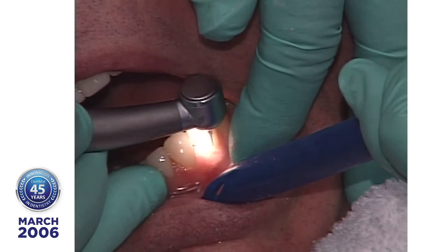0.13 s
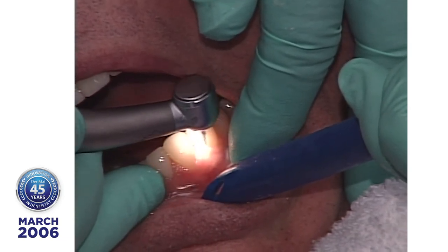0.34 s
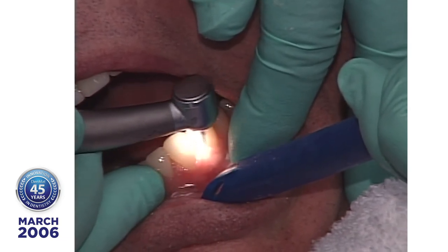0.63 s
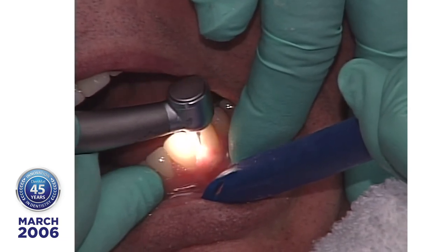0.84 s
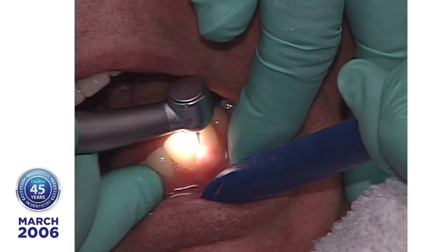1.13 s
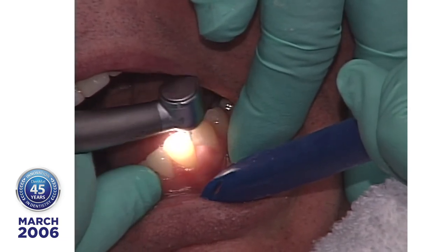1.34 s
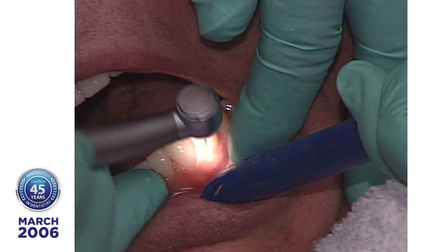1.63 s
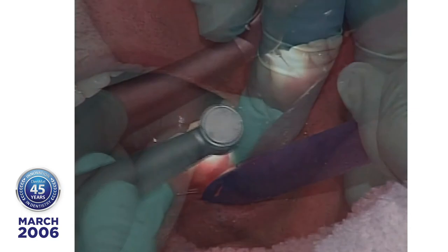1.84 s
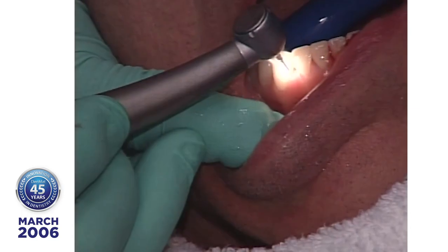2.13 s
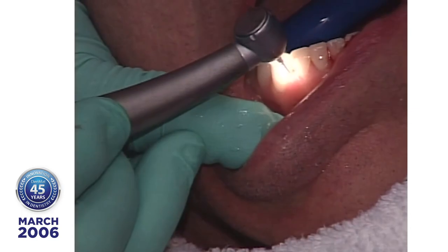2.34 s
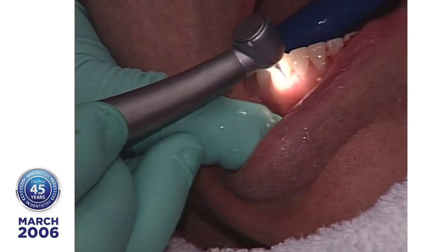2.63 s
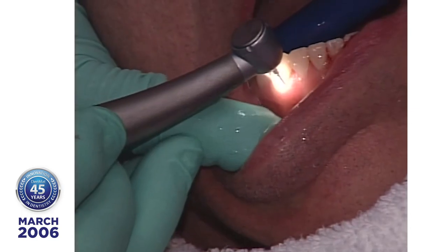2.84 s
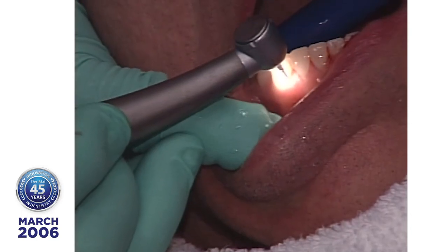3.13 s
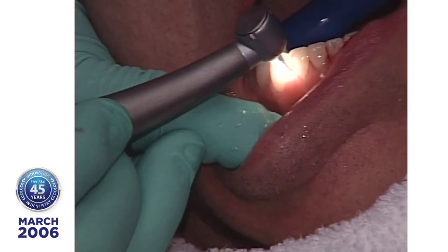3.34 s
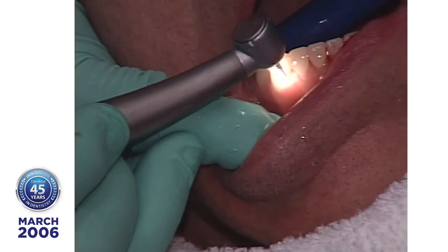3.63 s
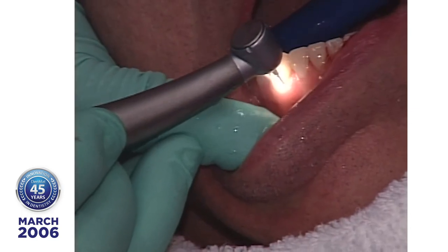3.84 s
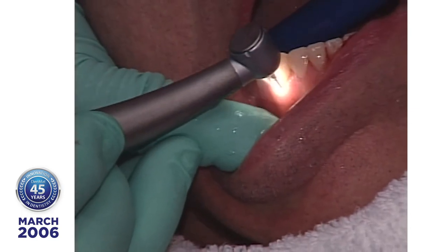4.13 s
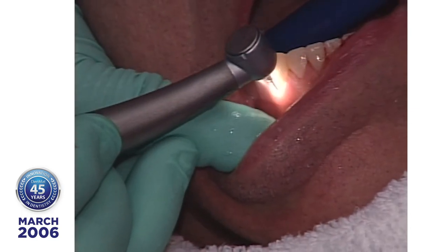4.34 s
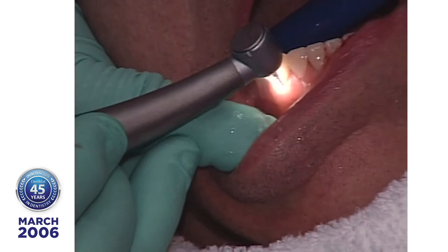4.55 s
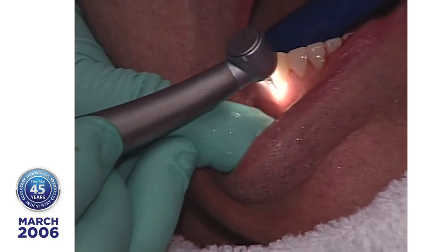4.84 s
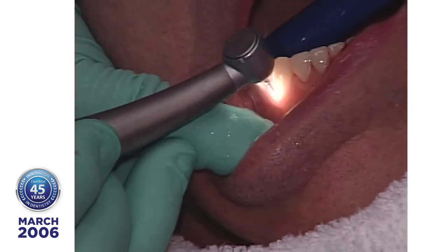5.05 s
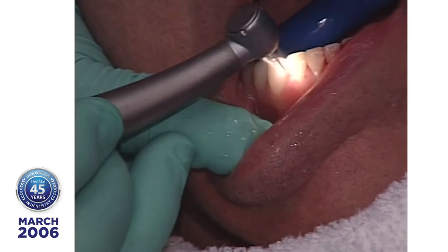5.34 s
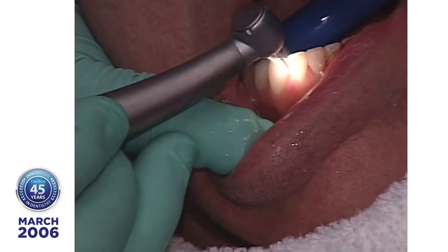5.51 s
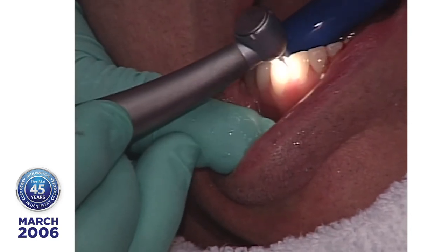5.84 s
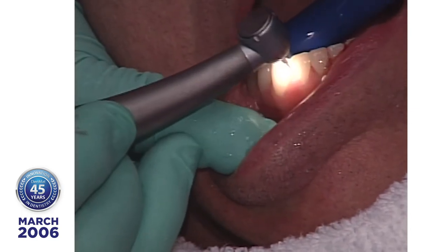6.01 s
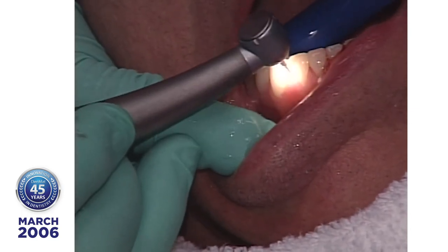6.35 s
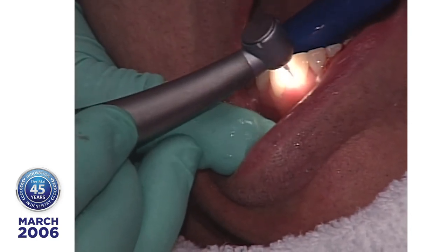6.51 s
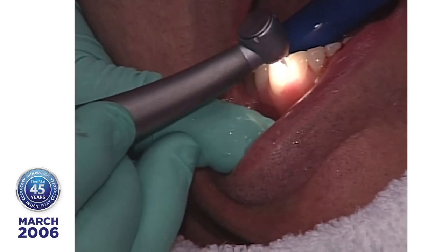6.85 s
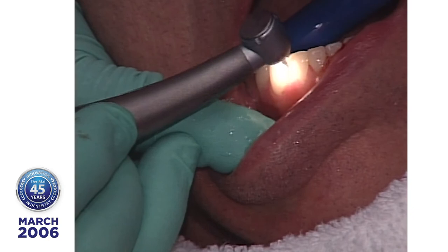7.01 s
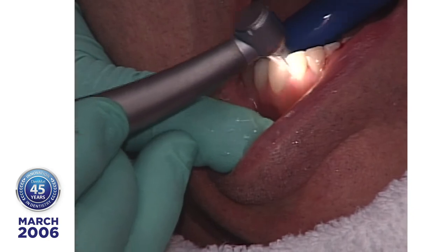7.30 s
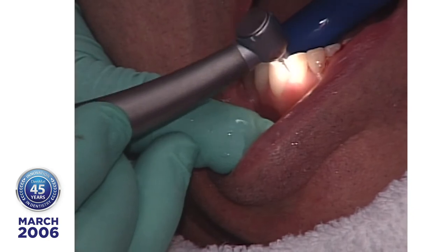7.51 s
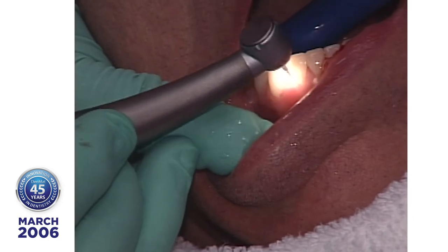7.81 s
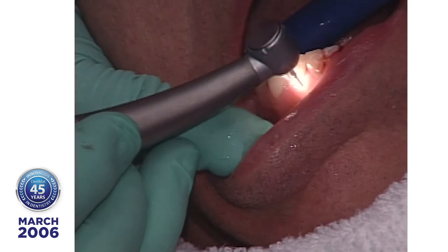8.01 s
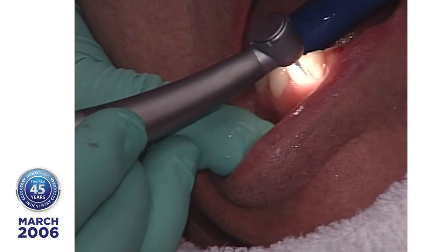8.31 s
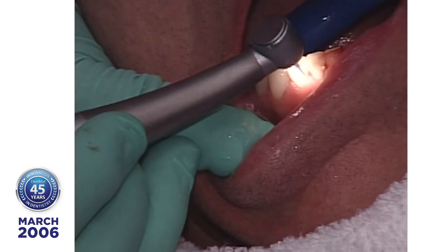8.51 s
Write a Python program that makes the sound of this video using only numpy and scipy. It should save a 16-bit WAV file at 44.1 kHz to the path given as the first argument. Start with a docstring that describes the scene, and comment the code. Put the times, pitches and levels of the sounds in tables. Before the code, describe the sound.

In a dental clinic, close and dry in mono, a suction tip roars dully against the lip over bright spray hiss. It soon lifts and rings more openly, hollow and fluttering. A thin turbine whine comes and goes, sagging in pitch under load. Later, faint low thumps and a little cloth rustle join in; everything continues to the end.

```python
"""An air-turbine dental handpiece trims teeth beside a suction tip, heard by one close microphone.
At first the suction roars dully against the lip, through the odd modes of its tube, over spray hiss;
from 0.6 s the rotor whines near 5 kHz, sagging under load, and the tip lifts and rings more clearly.
From 2.1 s brief low hums, bumps of the hands and a rustle of cloth join in. The spray is shaped noise whose
colour turns at about 0.8, 2, 5 and 8 s with the hold of the head; the whine comes and goes to the end."""
import sys
import numpy as np
from scipy import signal
from scipy.fft import rfft, irfft, next_fast_len
from scipy.io import wavfile
from scipy.ndimage import uniform_filter1d

SR = 44100
rng = np.random.default_rng(int(sys.argv[2]) if len(sys.argv) > 2 else 0)


def generate_wav(signal):
    """Clip the signal to [-1, 1] and save it as 16-bit WAV at the path in sys.argv[1]."""
    frames = np.transpose(np.atleast_2d(signal))
    scaled = np.clip(frames, -1, 1) * 32767
    pcm = np.round(scaled).astype(np.int16)
    wavfile.write(sys.argv[1], SR, pcm)


N = 382347
T = np.arange(N) / SR
SIZE = next_fast_len(N)
HZ = np.maximum(np.arange(SIZE // 2 + 1) * SR / SIZE, 1)


def undb(db):
    """Decibel law: the amplitude gain of a level in dB."""
    return 10 ** (np.asarray(db) / 20)


def unit(x):
    """Normalisation: the signal scaled to rms 1."""
    return x / np.sqrt(np.mean(x ** 2))


def curves(table):
    """Linear interpolation: columns of a table joined by straight lines in time."""
    seconds, *columns = np.transpose(table)
    return [np.interp(T, seconds, column) for column in columns]


def ramp(start, end):
    """Linear transition: rises from 0 to 1 between two times in seconds."""
    return np.clip((T - start) / (end - start), 0, 1)


def to_sound(spectrum):
    """Fourier synthesis: the waveform of a spectrum, cut to the scene's length."""
    return irfft(spectrum, SIZE)[:N]


def noise():
    """Random excitation: the spectrum of white noise."""
    return rfft(rng.standard_normal(SIZE))


def walk(rate):
    """Random modulation: levels held 1 / rate seconds, smoothed twice, with rms 1."""
    hold = int(SR / rate)
    held = np.repeat(rng.standard_normal(N // hold + 1), hold)
    smooth = uniform_filter1d(uniform_filter1d(held, hold), hold)
    return unit(smooth[:N])


def ring(modes, flicker_db, rate):
    """Resonance: noise through steep modes (two poles in a row); each drops out briefly on its own."""
    spectrum, out = noise(), 0
    for hz, width, db in modes:
        detuning = (HZ / hz - hz / HZ) * hz / width
        gain = np.abs(1 + 1j * detuning) ** -2
        # the squared walk can only lower the level
        out = out + to_sound(spectrum * gain) * undb(db - flicker_db * walk(rate) ** 2)
    return out


def cut(x, hz, order):
    """High-pass filtering: steeply removes everything below hz."""
    return signal.sosfilt(signal.butter(order, hz, "high", fs=SR, output="sos"), x)


def patchy(x, low_hz, top_hz, width_hz, patchy_db, rate):
    """Random modulation: overlapping bands each waver in level on their own."""
    spectrum, out = rfft(x, SIZE), x
    for hz in np.arange(low_hz, top_hz, width_hz):
        band = np.cos(np.pi / 2 * np.clip((HZ - hz) / width_hz, -1, 1)) ** 2
        out = out + to_sound(spectrum * band) * (undb(patchy_db * walk(rate)) - 1)
    return out


def swings(table):
    """Windowed oscillation: sines under a sin-squared swell; rows of start, peak dB, Hz, length."""
    out = np.zeros(N)
    for start_s, db, hz, length in table:
        t = np.arange(int(length * SR)) / SR
        start = int(start_s * SR)
        swell = np.sin(np.pi * t / length) ** 2
        out[start:start + len(t)] += undb(db) * swell * np.sin(2 * np.pi * hz * t)
    return out


# The cloth rustles more while the hands shift.
# Each row: middle in seconds, half length in seconds, rise in dB.
HANDS_SHIFT = [(2.5, 0.55, 20), (7.2, 0.56, 8)]
RUSTLE_DB, RUSTLE_WAVER_DB = -104.5, 7.5  # level at rest, waver


def rustle():
    """Frictional noise: cloth as one broad low resonance, swelling in bell-shaped stretches."""
    shifting_db = sum(db * np.exp(-((T - middle) / half) ** 2) for middle, half, db in HANDS_SHIFT)
    cloth = unit(ring([(273, 220, 0)], 7.8, 14))
    return cloth * undb(RUSTLE_DB + shifting_db + RUSTLE_WAVER_DB * walk(9))


# Hands bump the microphone mount.
# Each row: time in seconds, peak of the swing in dB, its frequency in Hz, length of the knock in seconds.
BUMPS = [(2.366, -63, 62, 0.038), (2.417, -61, 43.5, 0.047), (2.47, -57.5, 69, 0.031),
         (2.66, -72, 40, 0.06), (2.8, -73, 40, 0.06), (3.002, -64, 41.2, 0.053), (3.063, -63, 52, 0.044),
         (3.105, -60.5, 37, 0.045), (3.852, -73, 35.0, 0.032), (4.16, -68, 37, 0.05),
         (4.25, -82, 83.4, 0.067), (4.487, -71, 42.6, 0.057), (4.726, -66, 38.2, 0.045),
         (5.184, -80, 40, 0.082), (5.35, -78, 40, 0.079), (5.85, -76, 38, 0.08), (6.088, -74, 43.1, 0.042),
         (6.25, -58.5, 41, 0.063), (6.85, -64, 34, 0.058), (7.13, -78, 38, 0.05), (7.467, -55, 61.6, 0.027),
         (7.56, -75, 99.6, 0.032), (7.806, -66, 48.4, 0.046), (7.925, -50.5, 39.6, 0.05),
         (7.956, -56.5, 26.9, 0.052), (8.038, -79, 35.0, 0.05), (8.506, -77, 37, 0.065)]
RUMBLE_DB, RUMBLE_WAVER_DB = -102, 6.5  # level at rest, waver
STIRRED_DB, STIRRED_S = -26, 0.18  # rumble against each bump's peak, decay time to either side


def rumble():
    """Forced vibration: low modes of the mount, faint at rest and stirred up around each bump."""
    stirred = sum(undb(db + STIRRED_DB) * np.exp(-np.abs(T - s) / STIRRED_S) for s, db, _, _ in BUMPS)
    level = (undb(RUMBLE_DB) + stirred) * undb(RUMBLE_WAVER_DB * walk(14))
    return unit(ring([(33.7, 17, 3), (92, 22, -16.5)], 2.5, 14)) * level


def bumps():
    """Transient response: a soft low swing of the mount, begun by a shorter, higher knock."""
    low = [(s - length / 2, db, hz, 2 * length) for s, db, hz, length in BUMPS]
    knocks = [(s - length / 2, db - 14.0, 100 + 0.14 * hz, length) for s, db, hz, length in BUMPS]
    return swings(low) + swings(knocks)


# Brief low hums. Each row: start in seconds, peak in dB, frequency in Hz, length in seconds.
HUMS = [(2.102, -77, 300, 0.052), (2.545, -64, 310, 0.11), (2.78, -66.5, 290, 0.1)]


def hums():
    """Tone bursts: single sines that swell and fade smoothly."""
    return swings(HUMS)


# The head turns from one hold to the next. Each row: start in seconds, end in seconds.
TURNS = [(.66, 0.88), (1.8, 2.6), (5.0, 5.4), (7.95, 8.05)]


def turns():
    """Gradual transition: for each turn of the head, a ramp from the old hold (0) to the new (1)."""
    return [ramp(start, end) for start, end in TURNS]


# Suction strength. Each row: time in seconds, level in dB, second mode against the first in dB,
# side resonances in dB.
SUCTION = [(0.0, -57, 1.5, -1.5), (0.02, -56.5, 1.5, -1.5), (0.77, -56.5, 7, -1.5), (0.79, -52, 1, 2.5),
           (1.13, -49.5, 2, 6), (2.66, -49, 1, -4.5), (2.85, -44, -1.5, -1.5), (2.94, -49.5, 1.5, -1),
           (3.02, -47, 1.5, -0.5), (3.31, -49.5, 1.5, -1.5), (3.67, -46, 1.5, -3), (4.73, -48.5, 4, 2),
           (5.12, -58, 1.5, -3.5), (5.26, -52.5, 1.5, -5), (5.5, -55.5, 2, -1.5), (5.55, -50, 2, -5),
           (5.82, -48.5, 2.5, -1.5), (5.87, -50.5, 0.5, -1), (6.5, -54.5, 1, -2), (6.9, -47, 1.5, -0.5),
           (8.04, -51.5, 3, 1), (8.67, -56, -1, -6.5)]
# Tip, nearly a tube closed at one end: first and second mode, then the weaker side resonances, strongest
# while the tip faces the microphone. Each row: frequency in Hz, width in Hz, level in dB.
TIP_LOW = [(963, 180, -8.5), (1075, 127, -5), (1228, 203, 5), (1450, 75, -20.5)]
TIP_HIGH = [(3086, 140, -12.5), (3347, 232, 0.5), (3582, 218, -4), (3815, 363, -6)]
TIP_MID = [(1620, 122, -8.5), (1980, 315, -15), (2410, 410, -24), (3964, 370, -10)]
# Tip lying against the lip, duller and wider. Each row: frequency in Hz, width in Hz, level in dB.
TIP_COVERED = [(990, 330, -11), (1123, 250, -1), (1350, 300, -4), (1610, 99, -5), (2300, 220, -11.5),
               (3140, 230, -9.5), (3390, 520, -3), (3760, 410, 1), (4230, 340, -14)]
# Long hose behind the tip. Each row: frequency in Hz, width in Hz, level in dB.
HOSE = [(208, 44, -22), (381.6, 28, -14.5), (462, 37.5, -6), (541, 58, -9), (625, 43, -11.5),
        (718, 71, -15), (832, 88, -18)]
# The tip's side branch swallows one band: its frequency in Hz, width in Hz, share of amplitude left.
HOLLOW = (2700, 296, 0.44)
TIP_BASS_CUT_HZ = 430  # the narrow tip passes no bass
HOSE_COVERED_DB = -2.5  # the hose is fainter while the tip is covered


def suction(gulp):
    """Tube resonance: turbulent air rings tip and hose; water passing makes it flutter."""
    level_db, upper_db, side_db = curves(SUCTION)
    free = ring(TIP_LOW, 0.81, 12)
    free = free + ring(TIP_HIGH, 0.13, 11) * undb(upper_db)
    free = free + ring(TIP_MID, 1.1, 21) * undb(side_db)
    lifted = turns()[0]  # the tip leaves the lip during the first turn
    tip = lifted * free + (1 - lifted) * ring(TIP_COVERED, 0.72, 8.9)
    hz, width, share = HOLLOW
    hollow = 1 - (1 - share) * np.exp(-((HZ - hz) / width * 2) ** 2)
    tip = cut(to_sound(rfft(tip, SIZE) * hollow), TIP_BASS_CUT_HZ, order=4)
    hose = ring(HOSE, 10.2, 20) * undb(HOSE_COVERED_DB * (1 - lifted))
    return (tip + hose) / np.std(tip) * undb(level_db + 0.5 * gulp)


# Spray strength. Each row: time in seconds, water splashing on the tooth in dB, air jet in dB.
SPRAY = [(0.0, -54.5, -52), (0.6, -56, -52), (0.77, -62.5, -52.5), (1.28, -66, -50.5), (1.91, -59, -51.5),
         (2.0, -64, -53), (2.46, -61, -56), (2.8, -57.5, -52), (3.31, -60, -54.5), (4.3, -57.5, -51.5),
         (4.8, -58, -53), (4.95, -67.5, -54.5), (5.09, -68, -61.5), (5.26, -70, -52.5), (5.43, -72, -58),
         (5.75, -59.5, -54.5), (5.94, -70, -56), (5.99, -68, -55), (6.57, -68.5, -55.5), (6.83, -60, -52.5),
         (7.9, -64, -54.5), (8.04, -66, -51.5), (8.38, -71.5, -56.5), (8.67, -72, -56.5)]
# Colour of the spray, one list for each way the head is held.
# Each row: frequency in Hz, relative spectral level in dB.
HOLDS = [
    [(2530, -33), (4300, -9), (4780, -6.5), (5680, 1.5), (6590, -0.5), (7140, -6.5), (7950, -5.5),
     (8990, 1.5), (10800, 0.5), (11600, -6.5), (12300, -32), (13300, -8), (14100, -2), (14800, -17),
     (15400, -25)],
    [(2530, -46), (4300, -5), (4610, -23), (5070, -7.5), (5410, -17.5), (5500, -17), (6050, -8),
     (6770, -15), (8340, -13), (9090, -2), (10400, -1.5), (11100, -4.5), (13100, -26), (14200, -18),
     (15400, -37)],
    [(2530, -27), (4300, 4), (4990, 8), (5470, -1), (6280, 4), (6990, -7), (8030, 0), (9040, 2.5),
     (9740, 0.5), (10600, 5), (12100, -12.5), (12700, -3.5), (13400, -4.5), (14400, -9), (15400, -23)],
    [(2530, -32), (4300, -5.5), (4840, 1.5), (5470, -7), (6250, -0.5), (6990, -12), (7420, -9.5),
     (8030, 3.5), (8390, 6), (8710, -2.5), (9230, 5), (10200, 6), (11700, -5), (14500, -9.5), (15400, -26)],
    [(2530, -62), (4300, -27), (4890, -13), (5990, -13), (6520, -13), (7070, -21), (7910, -9), (8610, -12),
     (9180, -5.5), (10100, -2), (11400, -13.5), (12700, -14), (13600, -21), (14600, -25), (15400, -41)],
]
SPLASH_TOP_HZ = 7200  # splash below, air jet above
SPRAY_CUT_HZ = 3470  # the spray has nothing below the tip's second mode


def spray(gulp):
    """Jet noise: cooling air and water as shaped noise; each hold's colour fades into the next."""
    splash_db, jet_db = curves(SPRAY)
    turned = [1] + turns() + [0]
    low = 1 / (1 + (HZ / SPLASH_TOP_HZ) ** 40)
    mist, splash, jet = noise(), 0, 0
    for colour, arrived, left in zip(HOLDS, turned, turned[1:]):
        hz, db = np.transpose(colour)
        shaped = mist * undb(np.interp(np.log(HZ), np.log(hz), db, left=-90))
        share = arrived - left
        splash = splash + share * unit(to_sound(shaped * low))
        jet = jet + share * unit(to_sound(shaped * (1 - low)))
    both = splash * undb(splash_db + 0.32 * gulp) + jet * undb(jet_db + 0.44 * gulp)
    return cut(both, SPRAY_CUT_HZ, order=6)


# Rotor speed, sagging whenever the bur is pressed on the tooth.
# Each row: time in seconds, turns per second in Hz.
ROTOR = [(0.6, 5150), (0.7, 5020), (0.9, 5255), (1.3, 5262), (1.9, 5205), (2.15, 4980), (2.65, 5170),
         (2.85, 5095), (3.13, 5250), (3.36, 5020), (3.63, 5240), (3.8, 4965), (3.9, 4885), (4.0, 4830),
         (4.14, 4855), (4.42, 4570), (4.75, 4950), (5.0, 4575), (5.2, 4876), (5.55, 5030), (5.76, 4630),
         (5.96, 4911), (6.2, 5095), (6.33, 5120), (6.5, 5010), (6.6, 5000), (6.75, 4860), (6.87, 4620),
         (6.93, 4730), (7.0, 4620), (7.08, 4715), (7.2, 4610), (7.45, 4870), (7.82, 5040), (8.0, 4625),
         (8.22, 4890), (8.67, 5075)]
# Lines of the whine as multiples of the speed; the two that are not whole are likely the bearing.
MULTIPLES = (1, 2, 3, 1.33, 1.43)
# Stretches where each line stands out of the hiss, one list per multiple.
# Each row: start in seconds, end in seconds, rms level in dB before the flicker.
WHINE = [
    [(.62, .72, -73), (.82, 1.97, -70), (2.55, 3.5, -66), (3.5, 4.4, -64.5), (4.6, 4.87, -65),
     (4.87, 5.04, -69), (5.04, 5.55, -76), (5.55, 5.82, -69), (5.95, 6.08, -68), (6.08, 6.56, -72),
     (6.65, 6.82, -70), (7.84, 7.92, -76), (8.22, 8.53, -77), (8.53, 8.7, -70)],
    [(2.42, 2.65, -66), (2.65, 2.86, -57), (2.86, 3.1, -65), (3.1, 3.3, -61), (3.45, 3.85, -63),
     (3.9, 4.15, -68), (4.27, 4.36, -60), (4.36, 4.46, -54), (4.92, 5.03, -60), (6.8, 7.22, -74)],
    [(3.76, 4.2, -77), (4.2, 4.52, -71), (4.76, 5.03, -72), (5.57, 5.76, -75), (6.62, 6.76, -77),
     (6.76, 7.02, -71), (7.11, 7.19, -72), (7.82, 8.01, -75)],
    [(5.07, 5.3, -78), (7.23, 7.37, -76), (7.98, 8.25, -75), (8.25, 8.56, -81), (8.56, 8.7, -74)],
    [(6.62, 6.8, -79), (6.8, 7.1, -76)],
]
INERTIA_S, FADE_S = 0.05, 0.028  # smoothing of the speed, fade of each stretch


def whine():
    """Periodic forcing: rotor unbalance and its multiples; speed trembles and each line flickers."""
    hz = uniform_filter1d(curves(ROTOR)[0], int(INERTIA_S * SR))
    trembling_hz = hz * (1 + 0.0015 * walk(40))
    phase = 2 * np.pi * np.cumsum(trembling_hz) / SR
    out = 0
    for multiple, stretches in zip(MULTIPLES, WHINE):
        heard = 0
        for start, end, db in stretches:
            inside = np.minimum(T - start, end - T)  # seconds to the nearer edge
            heard = heard + undb(db) * np.clip(inside / FADE_S + 0.5, 0, 1)
        out = out + heard * undb(1.6 * walk(22)) * np.sin(multiple * phase)
    return np.sqrt(2) * out  # a sine's peak for its rms


def scene():
    """Superposition: all sources add at one microphone, so both channels are alike."""
    gulp = walk(16)  # flutter shared by suction and spray
    mount = rustle() + rumble() + bumps() + hums()
    roar = patchy(suction(gulp), 345, 4400, 110.2, 1.85, 20)
    mist = patchy(spray(gulp), 4300, 15600, 397, 1.45, 18)
    mono = mount + roar + mist + whine()
    return np.array([mono, mono])


TOP_HZ = 15580


def record(dry):
    """Band limiting: the microphone fades in the last kilohertz and the recorder cuts the top."""
    soft = signal.sosfilt(signal.butter(8, 14900, fs=SR, output="sos"), dry)
    return signal.sosfilt(signal.ellip(10, 0.2, 60, TOP_HZ, fs=SR, output="sos"), soft)


dry = scene()
out = record(dry)
generate_wav(out)
```